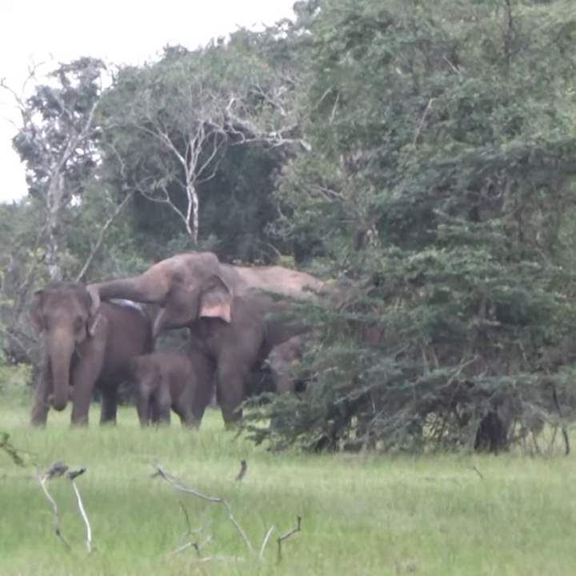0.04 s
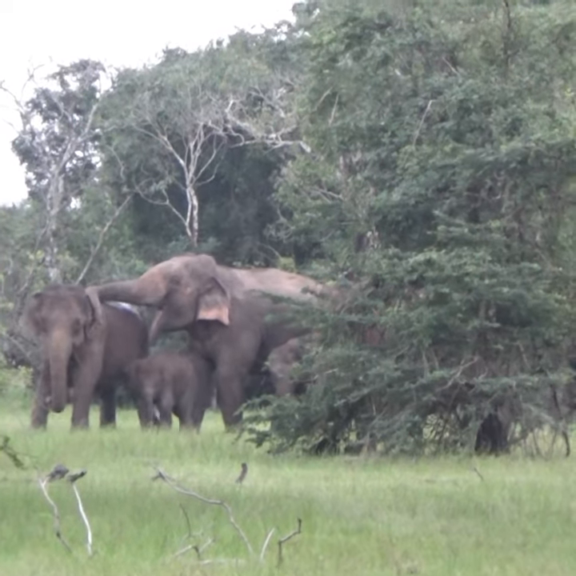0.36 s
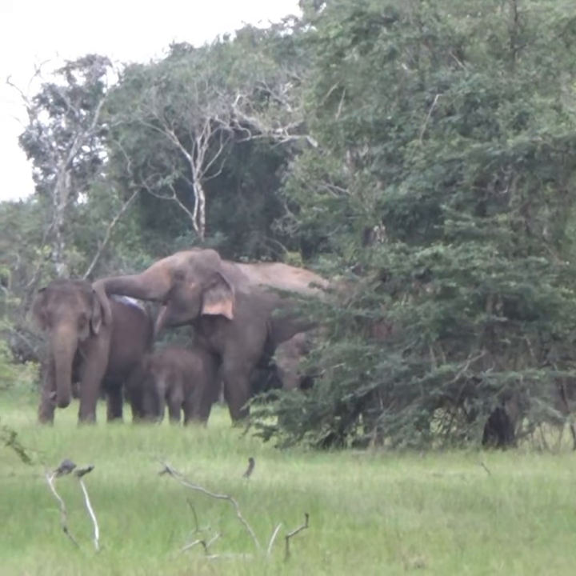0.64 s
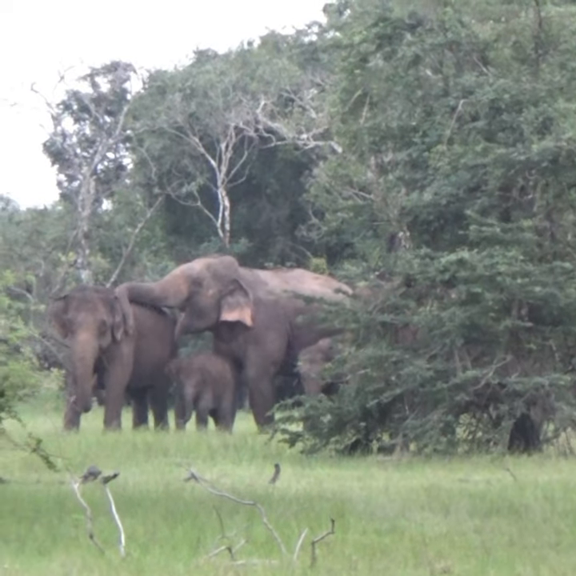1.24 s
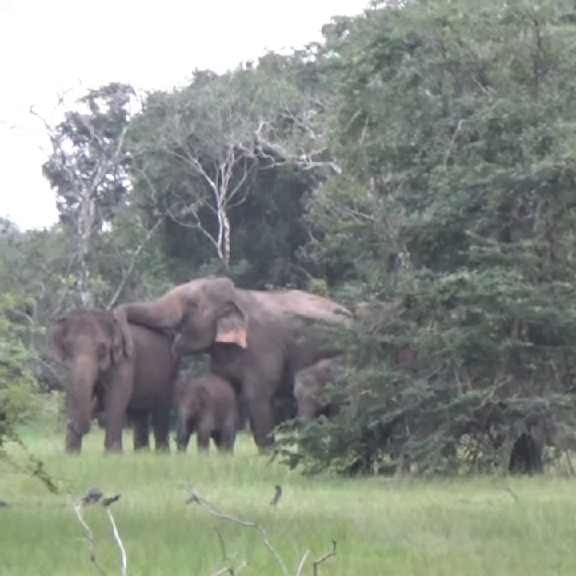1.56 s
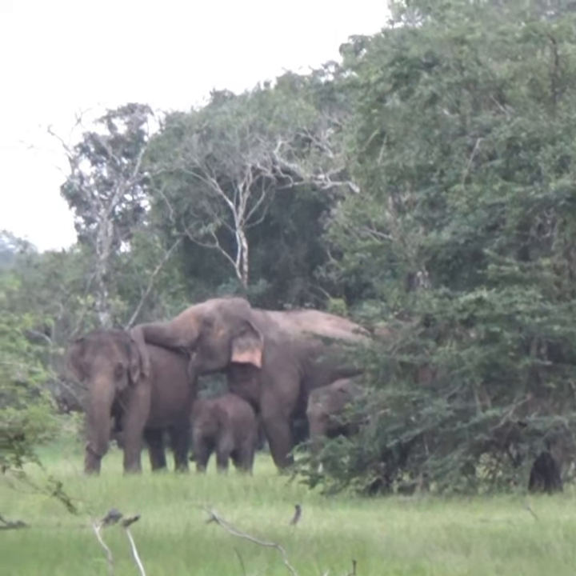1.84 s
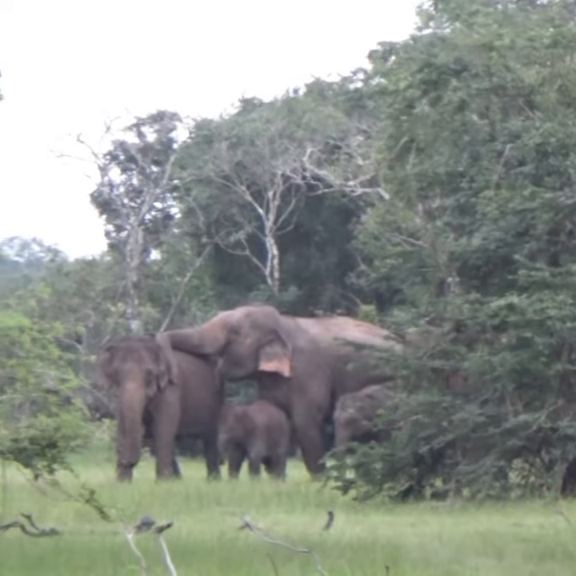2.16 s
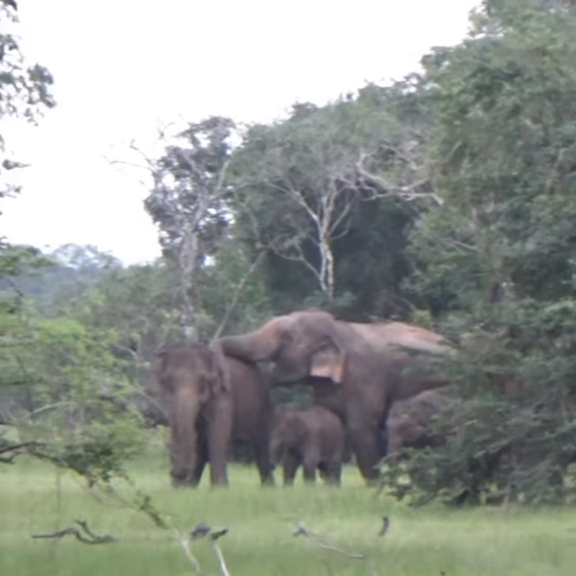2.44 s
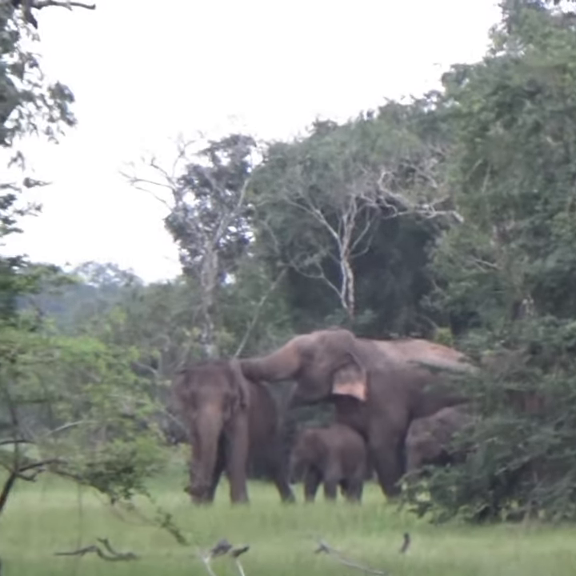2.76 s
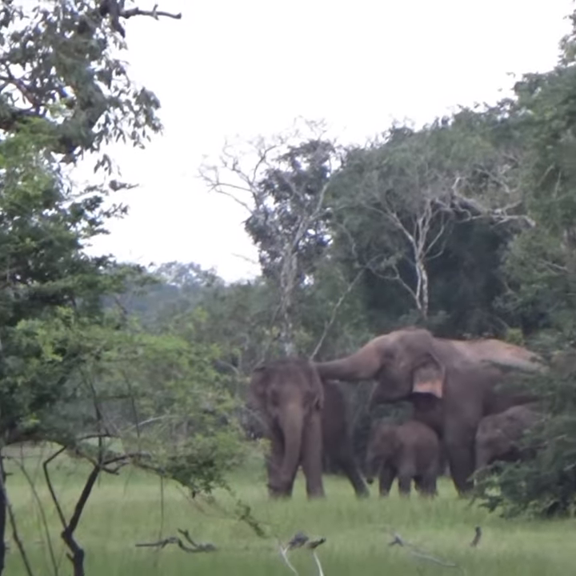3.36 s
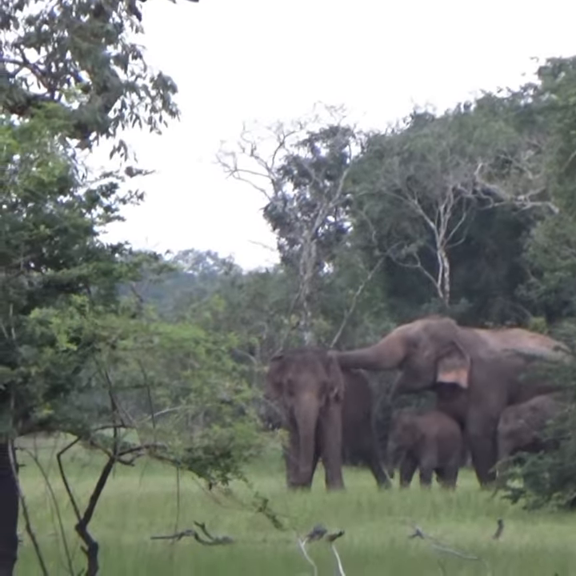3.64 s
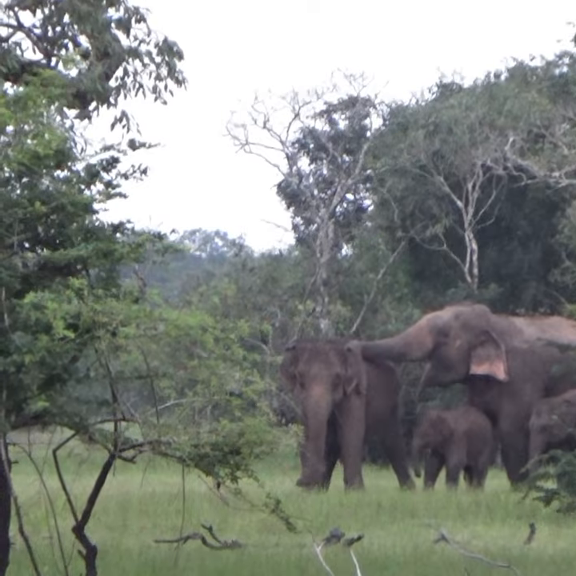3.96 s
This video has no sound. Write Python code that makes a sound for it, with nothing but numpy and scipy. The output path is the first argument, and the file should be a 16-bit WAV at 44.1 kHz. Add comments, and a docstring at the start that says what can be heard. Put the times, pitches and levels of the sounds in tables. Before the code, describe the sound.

A cricket chirrs close to the microphone, slightly left, in rapid high-pitched bursts throughout. Distant insects, faint birds and a low rumble of air fill the forest clearing. Fingers tick softly on the camera and knock once late on.

```python
"""Cricket at the edge of a forest clearing

A cricket chirrs close to the microphone, a little to the left, scraping its wings in bursts of about
a dozen strokes, each falling in pitch. Farther off: an insect chorus, a few faint birds among the
trees and a low rumble of outdoor air. Fingers on the hand-held camera make one hollow knock,
a few ticks and soft rustles."""
import sys
import numpy as np
from scipy import signal
from scipy.fft import rfft, irfft
from scipy.io import wavfile

SR = 44100
rng = np.random.default_rng(int(sys.argv[2]) if len(sys.argv) > 2 else 0)


def dump(signal):
    """Clip the signal to [-1, 1] and save it as 16-bit WAV at the path in sys.argv[1]."""
    limited = np.clip(np.atleast_2d(signal).T, -1, 1)
    pcm = np.round(limited * 32767).astype(np.int16)
    wavfile.write(sys.argv[1], SR, pcm)


N = 176400  # 4 s


def amp(db):
    """Decibels to gain."""
    return 10 ** (np.asarray(db) / 20)


def unit(x):
    """Scales to rms 1."""
    return x / np.sqrt(np.mean(x ** 2) + 1e-20)


def read(points, hz):
    """Interpolates a table on a log-frequency axis."""
    f, value = np.transpose(points)
    return np.interp(np.log(hz + 1), np.log(f + 1), value)


def add(mix, start_s, sound):
    """Mixes a sound in at start_s, dropping what falls outside the mix."""
    at = round(start_s * SR)
    sound = sound[..., max(-at, 0):]
    part = mix[..., max(at, 0):][..., :sound.shape[-1]]
    part += sound[..., :part.shape[-1]]


def pan(db):
    """Stereo gains that make the left louder than the right by db."""
    return amp(np.array([[db], [-db]]) / 2)


def wander(size, hz):
    """Smooth random drift of rms 1, rolling off around hz."""
    f = np.fft.rfftfreq(size, 1 / SR)
    return unit(irfft(rfft(rng.standard_normal(size)) * np.exp(-(f / hz) ** 2), size))


def noise(size, shape, likeness):
    """Stereo noise of rms 1 with spectrum shape(f); likeness is the left-right correlation."""
    left, other = rfft(rng.standard_normal((2, size)))
    likeness = np.clip(likeness, -1, 1)
    right = likeness * left + np.sqrt(1 - likeness ** 2) * other
    return unit(irfft(np.array([left, right]) * shape(np.fft.rfftfreq(size, 1 / SR)), size))


def hump(hz, octaves):
    """A bell-shaped spectrum around hz."""
    return lambda f: np.exp(-.5 * (np.log2((f + 1) / hz) / octaves) ** 2)


def swell(size):
    """A half-sine rise and fall."""
    return np.sin(np.pi * np.arange(size) / size)


def scatter(x, t60_s):
    """Diffuse echoes from leaves and trunks, different at each microphone."""
    t = np.arange(0, t60_s, 1 / SR)
    tail = rng.standard_normal((2, len(t))) * amp(-60 * t / t60_s)
    tail /= np.linalg.norm(tail, axis=1, keepdims=True)
    return signal.fftconvolve(x[None], tail, axes=1)[:, :len(x)]


def microphone_pair(x, delay_s=.000005):
    """The sound reaches the right microphone a moment after the left."""
    f = np.fft.rfftfreq(len(x), 1 / SR)
    right = irfft(rfft(x) * np.exp(-2j * np.pi * f * delay_s), len(x))
    return np.array([x, right])


def air():
    """Outdoor air all around: steady rumble and hiss with two soft low swells."""
    # spectrum of the air: frequency_hz, relative_db
    spectrum = [(20, -10.5), (45, -5.5), (75, 1), (110, 0), (160, -5.5), (230, -6), (330, -11),
                (480, -12.5), (630, -5.5), (710, -9.5), (820, -7), (980, -13.5), (1140, -13.5), (1350, -17),
                (2000, -18), (3000, -19.5), (4200, -23), (6500, -24), (11000, -28), (16000, -31.5)]
    # how alike the two microphones hear it: frequency_hz, correlation
    likeness = [(40, 0.99), (120, 1), (300, 0.66), (800, 0.61), (1500, 0.1), (3000, 0.38), (6000, 0.78),
                (12000, 1)]
    # swells of rumble: start_s, length_s, level_db, centre_hz
    rumbles = [(.03, 0.87, -64, 94), (3.66, 0.31, -55.5, 48.3)]
    out = noise(N, lambda f: amp(read(spectrum, f)), read(likeness, np.fft.rfftfreq(N, 1 / SR)))
    out *= amp(-54 + 0.6 * wander(N, hz=8.3))
    for start, length, db, hz in rumbles:
        size = int(length * SR)
        add(out, start, amp(db) * swell(size) * noise(size, hump(hz, octaves=0.56), likeness=.98))
    return out


def leaves(start_s=1.43, rise_s=0.97):
    """A faint, wide leafy hiss fades in about halfway and stays."""
    rise = np.clip((np.arange(N) / SR - start_s) / rise_s, 0, 1)
    hiss = noise(N, hump(hz=2170, octaves=1), likeness=0.33)
    return rise * amp(-65.5 + 2 * wander(N, hz=13)) * hiss


def insect_chorus():
    """Many far insects blur into one high, shimmering band."""
    # spectrum of the chorus: frequency_hz, relative_db
    spectrum = [(6500, -51), (7400, -12), (7900, -7), (8400, 3), (8800, -2.5), (9150, -2.5), (9600, -5),
                (10200, -13.5), (11000, -30.5), (12500, -83)]
    band = noise(N, lambda f: amp(read(spectrum, f)), likeness=0.76) * pan(-0.5)
    shimmer_db = 0.47 * wander(N, hz=129) + 1.1 * wander(N, hz=12)
    return band * amp(-50.5 + shimmer_db)


def buzzing_insect(centre_hz=7100, width_hz=420, pulses_per_s=120):
    """One insect, pitched below the chorus, buzzes twice."""
    # buzzes: start_s, length_s, level_db
    buzzes = [(0.987, 0.25, -61), (1.362, .25, -61)]
    out = np.zeros((2, N))
    for start, length, db in buzzes:
        t = np.arange(0, length, 1 / SR)
        band = noise(len(t), lambda f: np.exp(-.5 * ((f - centre_hz) / width_hz) ** 2), likeness=0.8)
        pulsing = 1 + 0.5 * np.sin(2 * np.pi * pulses_per_s * t)
        add(out, start, amp(db) * band * swell(len(t)) ** .5 * pulsing)
    return out


def whistle(length_s, db, pitches_hz):
    """A slightly rough bird note gliding through evenly spaced pitch points."""
    size = int(length_s * SR)
    glide = np.polyfit(np.linspace(0, 1, len(pitches_hz)), pitches_hz, len(pitches_hz) - 1)
    hz = np.polyval(glide, np.linspace(0, 1, size)) + 35 * wander(size, hz=315)
    flutter_db = 2 * wander(size, hz=200)
    return amp(db + flutter_db) * swell(size) * np.sin(2 * np.pi * np.cumsum(hz) / SR)


def birds(pip_s=.013, pip_fall_hz=200):
    """Faint slurred notes and a run of falling pips, echoing back among the trees."""
    # whistled notes: start_s, length_s, level_db, start_hz, one_third_hz, two_thirds_hz, end_hz
    notes = [(.53, 0.048, -58.5, 3200, 2950, 2750, 2850), (0.575, 0.037, -55.5, 2740, 3150, 3400, 2780),
             (.675, 0.033, -61, 2950, 3180, 3100, 3000), (.895, 0.042, -64, 2950, 3020, 2950, 2950),
             (1.945, 0.036, -61, 3200, 3090, 2950, 2900), (1.955, 0.046, -57, 6900, 5940, 5220, 4750),
             (2.155, 0.047, -62, 5900, 6600, 6450, 5600), (2.172, .072, -57.5, 6700, 5380, 4630, 4700),
             (2.277, 0.026, -56, 3200, 3030, 2910, 2900), (2.597, 0.024, -61, 3150, 3080, 2940, 2900),
             (2.657, 0.024, -54.5, 3250, 3120, 2900, 2800)]
    # a twittering bird's pips: middle_s, pitch_hz, relative_db
    pips = [(2.471, 3520, -55), (2.512, 3490, -60), (2.551, 3440, -60.5), (2.592, 3550, -58),
            (2.632, 3540, -60), (2.712, 3480, -59), (3.072, 3500, -60), (3.151, 3500, -59),
            (3.192, 2750, -56), (3.231, 3560, -62), (3.272, 2770, -58), (3.311, 3530, -62),
            (3.351, 3520, -60), (3.382, 3500, -60), (3.431, 3470, -61), (3.46, 3530, -57),
            (3.512, 3530, -60), (3.552, 3530, -61), (3.592, 3470, -59), (3.793, 2790, -61),
            (3.815, 2770, -58)]
    song = np.zeros(N)
    for start, length, db, *pitches in notes:
        add(song, start, whistle(length, db, pitches))
    for middle, hz, db in pips:
        pitches = [hz + pip_fall_hz / 2, hz - pip_fall_hz / 2]
        add(song, middle - pip_s / 2, whistle(pip_s, db - 0.5, pitches))
    return song + amp(-3) * scatter(song, t60_s=0.21)


def casing_knock(crack_t60_s=.017):
    """A knock on the camera, right at the microphone, cracks and briefly rings the hollow casing."""
    # two contacts heard as one knock: start_s, relative_db
    contacts = [(2.9095, -38.5), (2.9107, -24)]
    # modes of the casing: pitch_hz, relative_db, t60_s
    modes = [(640, -11.5, 0.029), (864, -3, 0.028), (1110, 1.5, 0.022), (1540, -11, 0.022),
             (1820, -19, 0.021), (2780, -15.5, 0.0097), (3360, -30, 0.0085)]
    out, t = np.zeros((2, N)), np.arange(4000) / SR
    ring = sum(amp(db - 60 * t / t60) * np.sin(2 * np.pi * hz * t) for hz, db, t60 in modes)
    casing_band = signal.butter(2, [600, 5000], "bandpass", fs=SR, output="sos")
    for start, db in contacts:
        crack = noise(len(t), hump(hz=1500, octaves=0.77), likeness=0.25)
        crack *= amp(-16 - 60 * t / crack_t60_s)
        add(out, start, amp(db) * signal.sosfilt(casing_band, ring + crack) * pan(4.1))
    return out


def fingers(tick_t60_s=0.034):
    """Fingers tick and brush against the camera's casing."""
    # small ticks: start_s, level_db, centre_hz
    ticks = [(.477, -51.5, 1290), (1.037, -46.5, 1360), (1.398, -55, 1400), (1.942, -49, 1590),
             (2.397, -48, 1700), (2.777, -47.5, 2790), (3.038, -47.5, 3220), (3.558, -50, 3000)]
    # soft rustles: start_s, length_s, level_db, centre_hz, width_octaves
    rustles = [(0.981, 0.36, -62.5, 1400, 0.87), (1.892, 0.11, -62, 1400, 0.97),
               (2.19, .34, -56.5, 910, .7), (2.873, 0.058, -50.5, 1000, 1), (3.009, 0.15, -58, 4270, 0.55)]
    out, t = np.zeros((2, N)), np.arange(4000) / SR
    for start, db, hz in ticks:
        tick = noise(len(t), hump(hz, octaves=0.7), likeness=1.0)
        add(out, start, amp(db - 60 * t / tick_t60_s) * tick)
    for start, length, db, hz, octaves in rustles:
        size = int(length * SR)
        brush = noise(size, hump(hz, octaves), likeness=0.7)
        add(out, start, amp(db + 1.5 * wander(size, hz=90)) * swell(size) * brush)
    return out


def wing_stroke(t, pitch_hz=8237, top_hz=8684, slide_hz_per_s=152000):
    """The scraper catches the file, then sweeps it, loudest at t = 0, the tone sliding down."""
    rise_s, fall_s, catch_s = .0018, .0011, .0015
    loudness, tuning, timing, grip = rng.standard_normal(4)  # no two strokes are alike
    sweep = np.exp(-(t / np.where(t < 0, rise_s, fall_s)) ** 2)
    lead_s = .0034 * (1 + 0.071 * timing)
    catch = amp(-8.5 + 1.4 * grip) * np.exp(-((t + lead_s) / catch_s) ** 2)
    slide_hz = np.minimum(pitch_hz - slide_hz_per_s * t, top_hz)
    slip_hz = 18 * tuning + 70 * wander(len(t), hz=900)
    cycles = np.cumsum(slide_hz + slip_hz) / SR
    tone = np.sin(2 * np.pi * (cycles - np.interp(0, t, cycles)))  # zero phase at the peak
    grain = 1 + 0.078 * wander(len(t), hz=1000)
    return amp(0.28 * loudness) * (sweep + catch) * tone * grain


def cricket(warm_up_strokes=1.7, slowing_s=.000008, jitter_s=.00002):
    """Close by on the left, bursts of almost evenly spaced wing strokes, each burst starting softly."""
    # chirps: last_stroke_s, stroke_count, strokes_per_s, relative_db
    chirps = [(0.0201, 11, 120, -33.4), (0.1505, 11, 118.5, -32.6), (0.2844, 11, 118.0, -33.0),
              (0.4166, 11, 118.2, -32.3), (0.545, 11, 119.2, -33.0), (0.6821, 11, 120.0, -32.6),
              (0.8156, 11, 119.7, -32.8), (0.9446, 11, 120.3, -33.1), (1.0732, 11, 119.8, -33.0),
              (1.206, 11, 118.2, -33.1), (1.3371, 11, 118.5, -33.2), (1.4687, 11, 118.1, -33.0),
              (1.6019, 11, 118.2, -33.4), (1.7415, 12, 118.5, -33.1), (1.8769, 12, 118.1, -33.3),
              (2.0017, 11, 117.2, -33.0), (2.1402, 12, 117.8, -33.2), (2.2625, 11, 118.5, -32.7),
              (2.3896, 11, 118.2, -32.3), (2.5146, 11, 116.4, -32.2), (2.652, 12, 118.1, -32.9),
              (2.7877, 12, 117.4, -32.6), (2.9124, 11, 116.8, -33.2), (3.051, 12, 116.4, -32.5),
              (3.1826, 12, 116.7, -32.0), (3.308, 12, 117.3, -32.7), (3.4415, 12, 117.4, -31.9),
              (3.5719, 12, 118.1, -32.9), (3.705, 12, 116.2, -32.6), (3.8478, 13, 116.1, -32.1),
              (3.9945, 13, 116.6, -32.0)]
    out, stroke_t = np.zeros((2, N)), np.arange(-.006, .003, 1 / SR)
    for last, count, rate, db in chirps:
        burst = np.zeros(SR // 5)
        for k in range(count):
            drag_s = slowing_s * k * (k - count + 1) / 2  # each gap is slowing_s longer than the last
            at_s = k / rate + drag_s + jitter_s * rng.standard_normal()
            subsample_s = round(at_s * SR) / SR - at_s
            warm_up_db = -4.5 * np.exp(-k / warm_up_strokes)
            add(burst, at_s, amp(warm_up_db) * wing_stroke(stroke_t + subsample_s))
        # fresh leaf echoes for each burst, as the camera moves in the hand
        heard = microphone_pair(burst) + amp(-14.5) * scatter(burst, t60_s=.03)
        start = last - (count - 1) / rate + stroke_t[0]
        add(out, start, amp(db + 0.97) * heard)
    return out * pan(3.3)


def scene():
    """The clearing, the handling and the near cricket, summed at the microphones."""
    clearing = air() + leaves() + insect_chorus() + buzzing_insect() + birds()
    return clearing + casing_knock() + fingers() + cricket()


def record(dry):
    """The recorder's band limit cuts off the highest treble."""
    lowpass = signal.firwin(801, 15850, window=("kaiser", 8), fs=SR)
    return signal.oaconvolve(dry, lowpass[None], "same")


dry = scene()
out = record(dry)
dump(out)
```